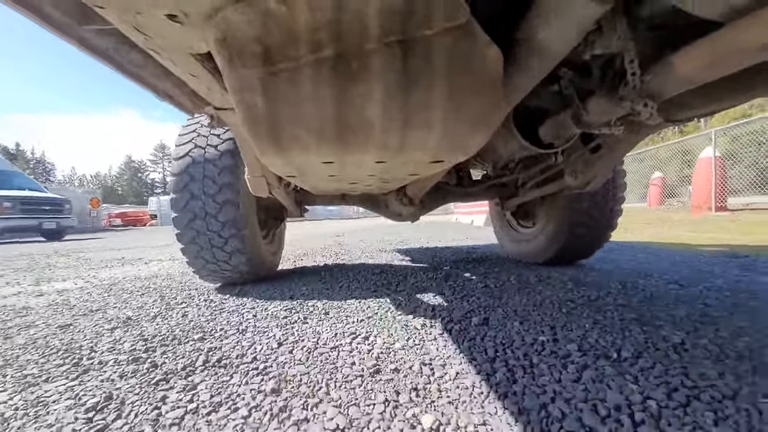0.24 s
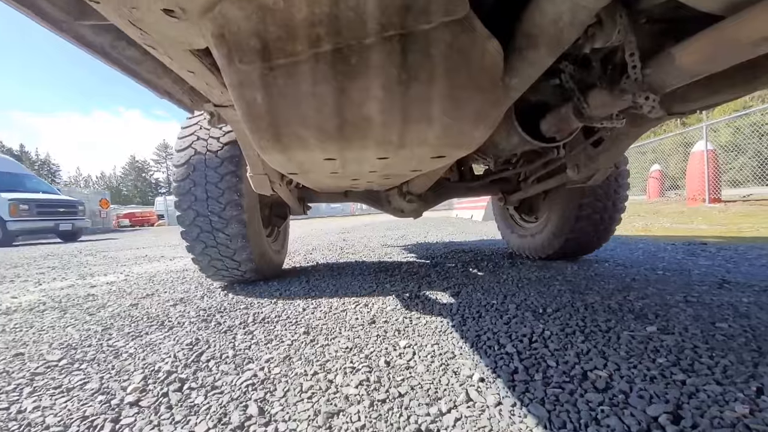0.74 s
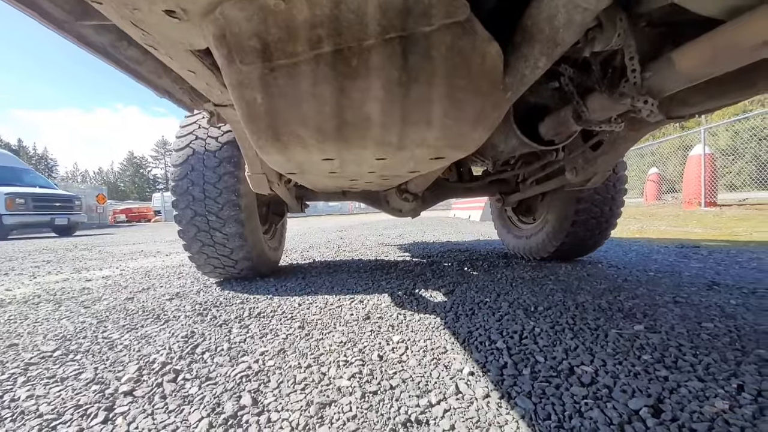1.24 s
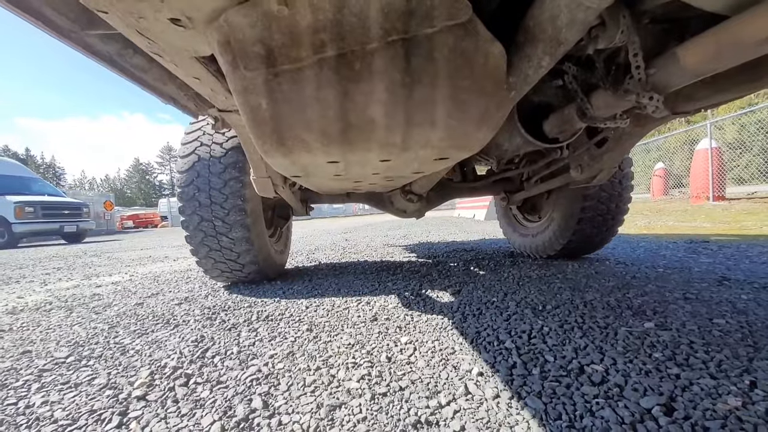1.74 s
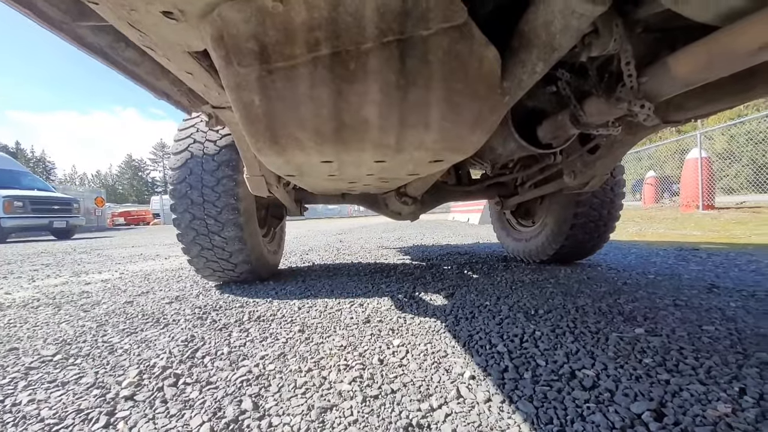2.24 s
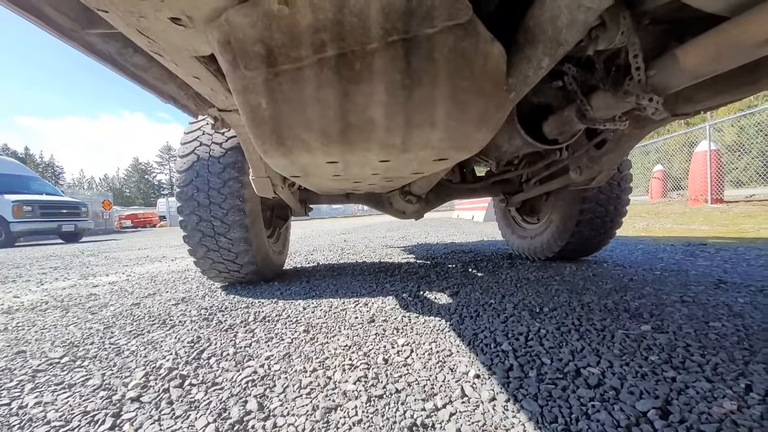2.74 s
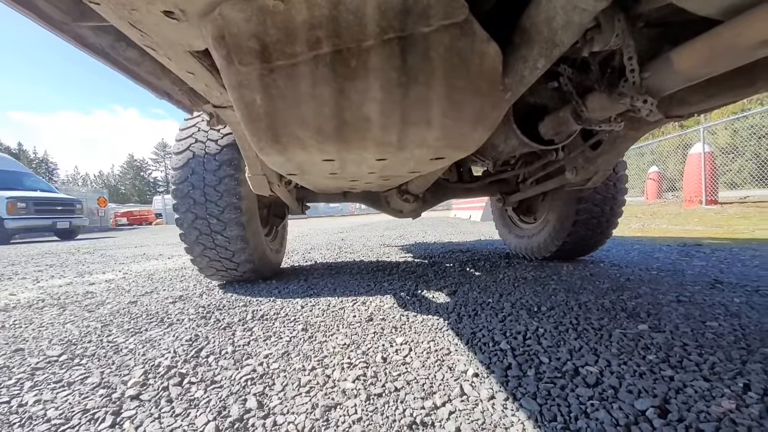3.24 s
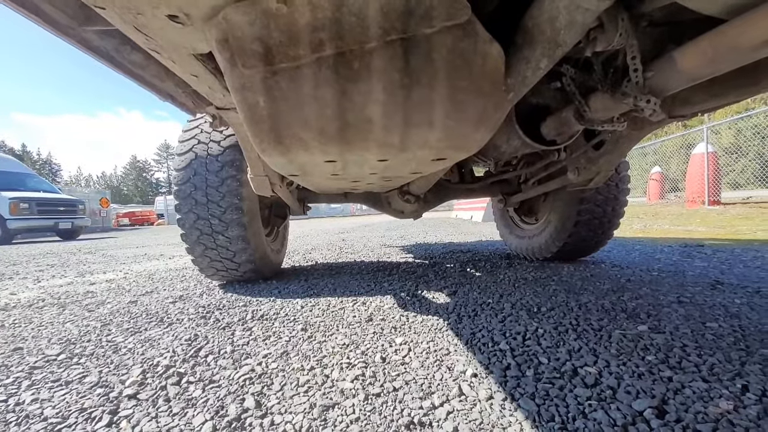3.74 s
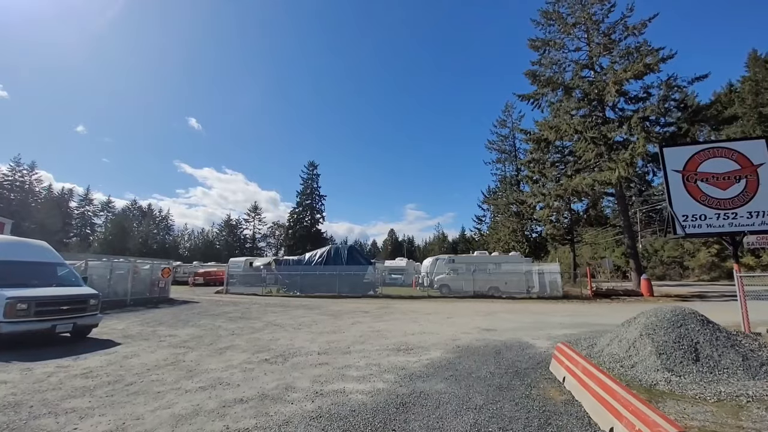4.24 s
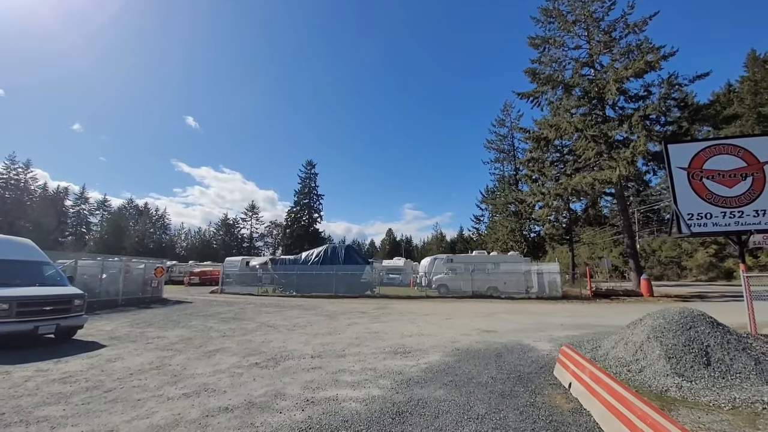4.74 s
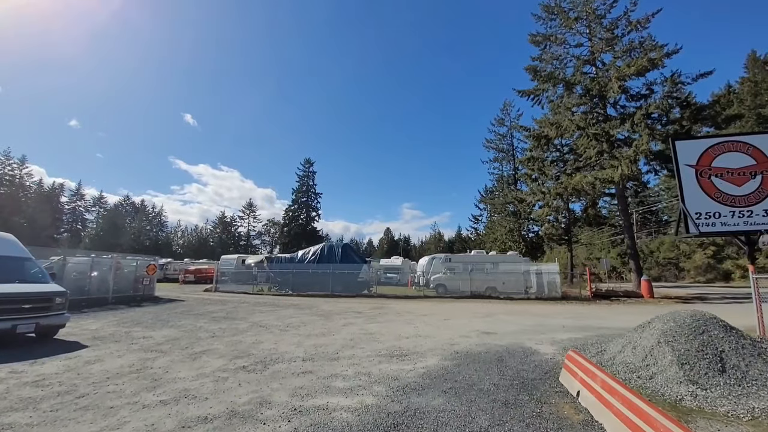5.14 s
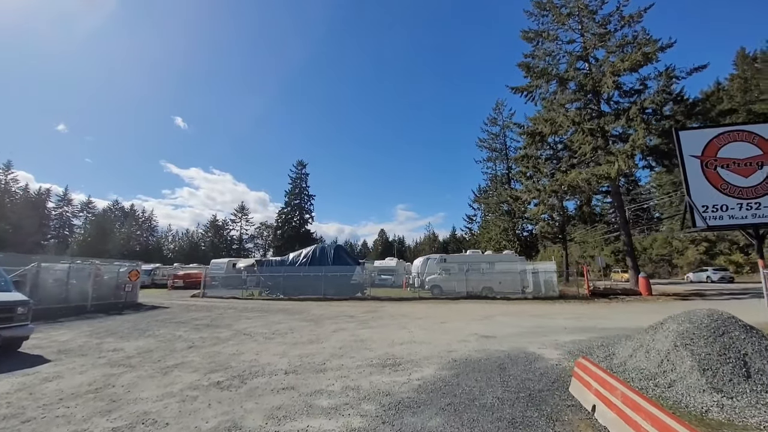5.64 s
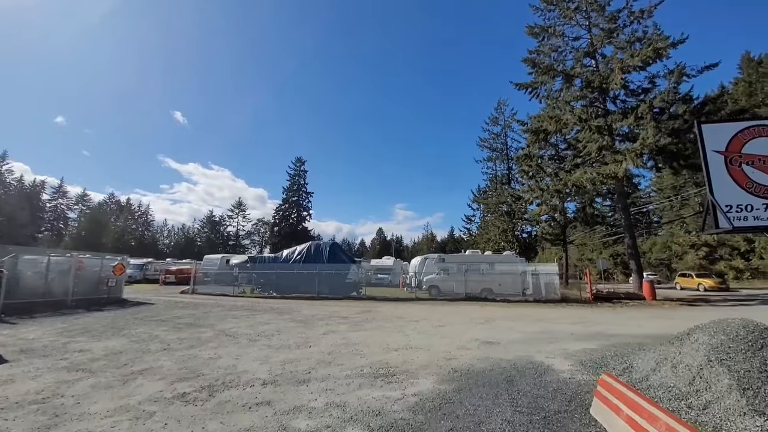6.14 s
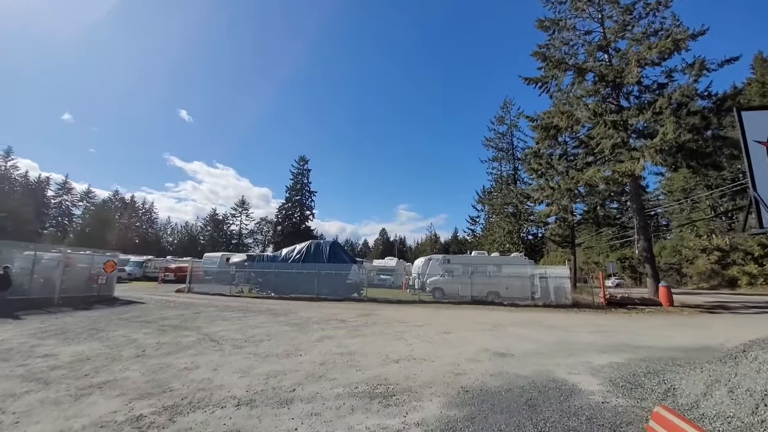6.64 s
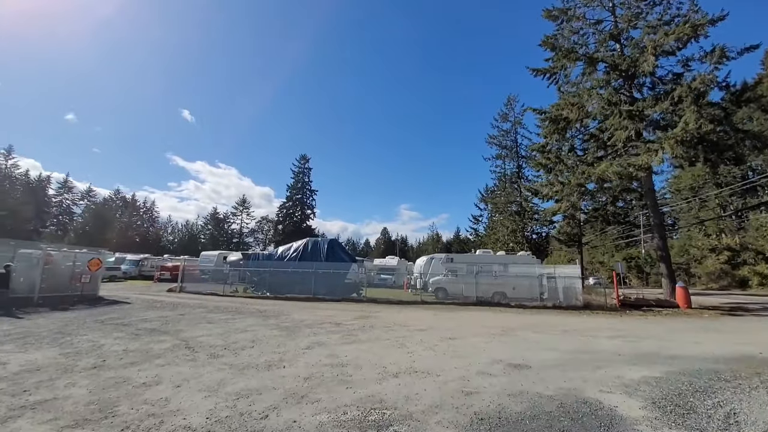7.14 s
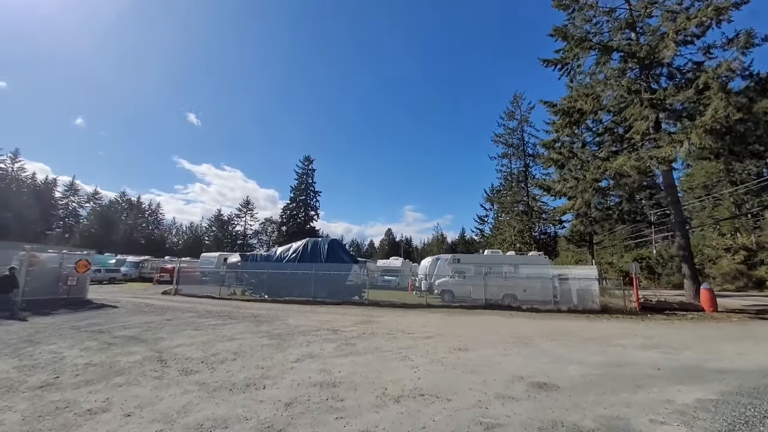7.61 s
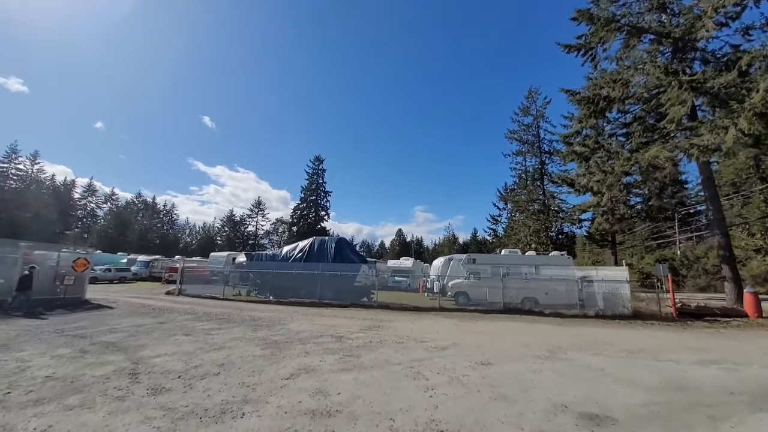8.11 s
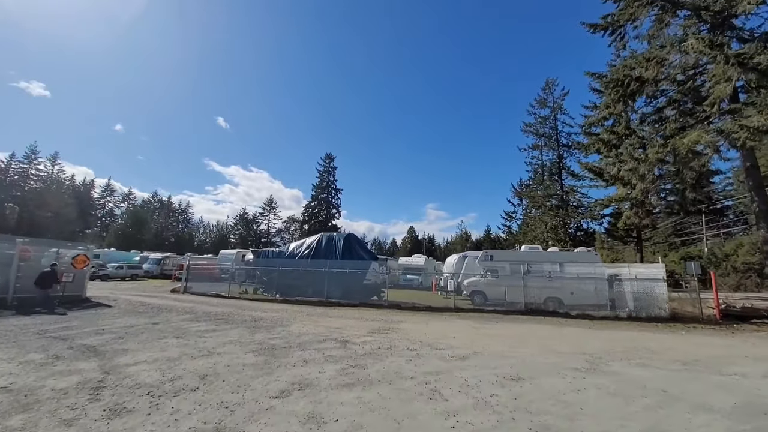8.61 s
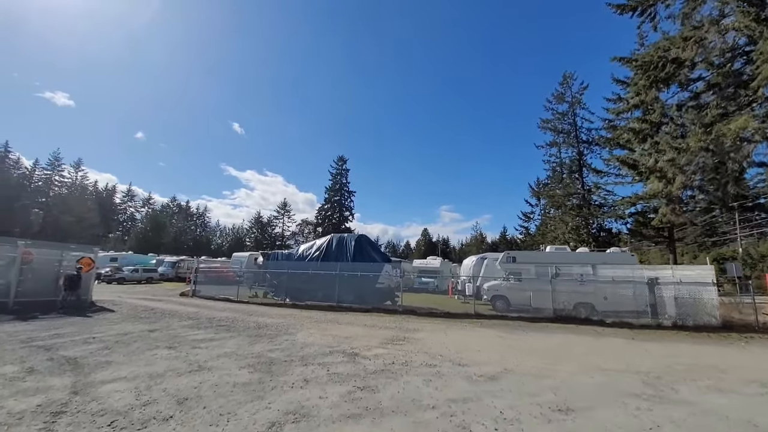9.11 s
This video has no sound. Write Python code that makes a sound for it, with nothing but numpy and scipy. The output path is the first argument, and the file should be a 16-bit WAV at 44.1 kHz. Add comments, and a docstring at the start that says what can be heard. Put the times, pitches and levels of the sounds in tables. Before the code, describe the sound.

A truck's throbbing engine and drive shaft are heard close up under the floor, with several knocks at the start. A brief turbo flutter follows, then the tyres grow louder, hissing and flinging grit. After an abrupt switch to the front, the engine note falls toward idle while gravel crunches steadily and a cluster of bumps rattles the suspension.

```python
"""A truck's turbocharged four-cylinder engine drones, heard first from under the floor, then the front.
Each firing sends a pulse that rings the exhaust, and the turning drive shaft rings the axle.
When the throttle shuts, trapped air flutters out of the turbo and the tyres hiss over gravel.
At the front the engine sinks to idle while the gravel crunches. Bumps make the suspension knock."""
import sys
import numpy as np
from scipy import signal
from scipy.fft import rfft, irfft, next_fast_len
from scipy.io import wavfile
from scipy.ndimage import uniform_filter1d, map_coordinates

SR = 44100
rng = np.random.default_rng(int(sys.argv[2]) if len(sys.argv) > 2 else 0)


def transcribe(signal):
    """Save signal, clipped to [-1, 1], as a 16-bit WAV file at the path in sys.argv[1]."""
    frames = np.atleast_2d(signal).T
    limited = np.clip(frames, -1, 1)
    pcm = np.round(limited * 32767).astype(np.int16)
    wavfile.write(sys.argv[1], SR, pcm)


N = 413199
FRONT_S = 4.066  # when the listener moves to the front
SIDE_TYRE = dict(direct=.55, lag_ms=.48)  # how a tyre off to one side reaches the two ears

# The tyres from below. Each row: time in seconds, rolling and scrubbing levels in relative dB.
TYRE_LEVELS_UNDER = [(2.05, -60, -76), (2.22, -54, -69.5), (2.63, -48, -61), (3.15, -42, -50.5),
                     (3.35, -43.5, -54), (3.65, -47, -46), (3.9, -47.5, -54), (4.01, -47, -56.5),
                     (4.05, -49, -55)]
# The engine from the front. Each row: time in seconds, firings a second, exhaust level in relative dB.
ENGINE_SLOWING = [(4.12, 56.4, -19.5), (4.25, 58.66, -21), (4.35, 59.17, -18), (4.51, 55.86, -25.5),
                  (4.98, 47.52, -28), (5.2, 43.54, -30.5), (5.61, 37.83, -32), (5.98, 35.96, -23),
                  (6.49, 35.9, -24.5), (7.31, 38.98, -28), (7.65, 37.28, -31), (7.98, 30.34, -28.5),
                  (8.37, 30.55, -29), (8.74, 29.07, -27.5), (8.87, 28.9, -26), (9.35, 27.14, -26)]
# Two noises from below, one gritty, one hissing. Each row: frequency in Hz, gain in dB.
GRITTY_COLOUR = [(700, -49), (1200, -18), (1420, -6), (1800, -11.5), (2850, -9.5), (3700, -17.5),
                 (6000, -55)]
HISSY_COLOUR = [(2000, -51), (3400, -6.5), (4650, -1.5), (5200, -7), (7300, -11), (8100, -9.5),
                (9100, -13.5), (12400, -12.5), (15800, -21.5)]


def amp(db):
    """Turn decibels into a gain."""
    return 10 ** (np.asarray(db) / 20)


def unit(x):
    """Scale a signal to an average (rms) level of 1."""
    return x / np.sqrt(np.mean(x ** 2) + 1e-20)


def clock():
    """The time in seconds at each sample."""
    return np.arange(N) / SR


def gain_at(colour, hz):
    """Read a gain at any frequency from rows of Hz and dB."""
    row_hz, row_db = np.transpose(colour)
    return amp(np.interp(np.log(hz + 1), np.log(row_hz + 1), row_db))


def curves(rows):
    """Join timed rows with straight lines: one curve for each column after the time."""
    times, *columns = np.transpose(rows)
    return [np.interp(clock(), times, column) for column in columns]


def swell(peak_s, db, width_s):
    """A gain that rises and falls in a bell shape."""
    return amp(db) * np.exp(-.5 * ((clock() - peak_s) / width_s) ** 2)


def wobble(rate):
    """A smooth curve through `rate` random values a second."""
    curve = map_coordinates(rng.standard_normal(8192), [np.arange(0, N, 16) * rate / SR], mode="wrap")
    return np.interp(np.arange(N), np.linspace(0, N, len(curve)), curve)


def filtered(x, response):
    """Multiply each frequency in x by response(hz)."""
    size = next_fast_len(N + SR // 4, True)
    return irfft(rfft(x, size) * response(np.fft.rfftfreq(size, 1 / SR)), size)[..., :N]


def stereo(x, lag_ms):
    """The sound reaches the left ear lag_ms after the right."""
    return filtered(x, lambda hz: np.exp(np.outer([-1, 1], 1j * np.pi * hz * lag_ms / 1000)))


def resonate(x, body, size=16384):
    """Let x ring a body described by rows of Hz and dB."""
    cepstrum = irfft(np.log(gain_at(body, np.fft.rfftfreq(size, 1 / SR))))
    # folding onto the first half makes the ring follow each push, never lead it
    cepstrum[1:size // 2] *= 2
    cepstrum[size // 2 + 1:] = 0
    ring = irfft(np.exp(rfft(cepstrum)))
    return signal.fftconvolve(x, ring)[:N]


def throb(cycles, body, uneven, jitter_ms, scatter_db, lag_ms):
    """One pulse a cycle rings a body, held at a steady level; every other pulse is weaker."""
    starts = np.flatnonzero(np.diff(np.floor(cycles)))
    size_luck, time_luck = rng.standard_normal((1024, 2))[:len(starts)].T
    sizes = amp(scatter_db * size_luck) * (1 + uneven * (-1) ** np.arange(len(starts)))
    starts = np.clip(starts + time_luck * jitter_ms * SR / 1000, 0, N - 1).astype(int)
    ringing = resonate(np.bincount(starts, sizes, N), body)
    power = uniform_filter1d(uniform_filter1d(ringing ** 2, size=SR // 8), size=SR // 8)
    return stereo(ringing / np.sqrt(np.abs(power) + 1e-16), lag_ms)


def rush(colour, direct, lag_ms, grain_db, patchy_db):
    """Grainy, patchy stereo noise at level 1; a share arrives directly, the rest is scattered."""
    grainy = rng.standard_normal((3, N)) * amp(grain_db * wobble(700))
    bands = signal.stft(grainy, nperseg=512)[2]
    flicker = rng.standard_normal(bands.shape[1:])
    flicker = uniform_filter1d(uniform_filter1d(flicker, size=6, axis=0), size=12, axis=1)
    patchy = signal.istft(bands * amp(patchy_db * unit(flicker)), nperseg=512)[1][:, :N]
    pair = np.sqrt(direct) * stereo(patchy[0], lag_ms) + np.sqrt(1 - direct) * patchy[1:]
    return unit(filtered(pair, lambda hz: gain_at(colour, hz)))


def chuff(firings, depth_db):
    """A gain that swells just after each firing, or dips if the depth is negative."""
    return unit(amp(depth_db * np.cos(2 * np.pi * (firings - .25))))


def engine_load(lift_s=1.26, ease_db_per_s=2.5, shut_db_per_s=19):
    """How hard the engine works, as a gain: it eases, then drops when the driver lifts off."""
    t = clock()
    return amp(-ease_db_per_s * t - shut_db_per_s * np.maximum(t - lift_s, 0))


def rumble(**texture):
    """A steady, deep noise behind everything else."""
    # Each row: frequency in Hz, gain in dB.
    deep_colour = [(20, -39), (42, -8), (60, -2), (170, -9.5), (260, -13.5), (500, -80.5)]
    return rush(deep_colour, **texture)


def tyres_under():
    """Road noise from below follows the engine load at first, then the tyres rolling and scrubbing."""
    # A low roar and a higher road noise. Each row: frequency in Hz, gain in dB.
    roar_colour = [(130, -34), (210, -7), (330, 1), (440, -6), (560, -11), (900, -42.5)]
    road_colour = [(300, 1), (500, -3), (780, 3), (1100, -1.5), (1350, -11), (2500, -60)]
    load = engine_load()
    rolling, scrubbing = amp(curves(TYRE_LEVELS_UNDER))
    roar = rush(roar_colour, direct=.68, lag_ms=.19, grain_db=4, patchy_db=2.5)
    roar *= np.hypot(amp(-26) * load, amp(3) * rolling)
    road = rush(road_colour, direct=.64, lag_ms=.24, grain_db=.5, patchy_db=2.5)
    road *= np.hypot(amp(-30) * load, amp(4.5) * rolling)
    gravel = rush(GRITTY_COLOUR, **SIDE_TYRE, grain_db=1, patchy_db=2)
    gravel *= amp(-13) * (rolling * scrubbing) ** .33
    hiss = amp(5.5) * scrubbing * rush(HISSY_COLOUR, **SIDE_TYRE, grain_db=1, patchy_db=2)
    return roar + road + gravel + hiss


def tyres_front(road_grind=.19, crunch_grind=.5, road_fade_db_per_s=.02):
    """Gravel crunches under the tyres; each grind share sets how far a noise follows the grinding."""
    # Each row: time in seconds, rolling and grinding levels in relative dB.
    tyre_levels = [(4.15, -48, -66), (4.28, -48, -67), (4.61, -47, -72.5), (5.01, -48, -74.5),
                   (5.8, -46, -72.5), (6.4, -44, -62.5), (7.02, -43, -60.5), (7.42, -44.5, -62),
                   (8.07, -43, -67.5), (8.6, -44.5, -66), (8.9, -42.5, -69.5), (9.3, -45.5, -68)]
    # Four tyre noises, from low to high. Each row: frequency in Hz, gain in dB.
    road_colour = [(100, -42), (200, -7.5), (260, -3), (390, -6), (640, -7), (850, -6.5), (1200, -12),
                   (2200, -65)]
    gravel_colour = [(620, -30), (1050, -2.5), (1300, 1), (1900, -1.5), (2800, -12.5), (3200, -25),
                     (6000, -78)]
    crunch_colour = [(1700, -28.5), (2900, -2.5), (3400, -4.5), (4150, -9), (5100, -12.5), (7200, -27),
                     (10000, -56)]
    hiss_colour = [(4000, -27), (6800, -4), (8200, -2.5), (9400, -5.5), (12300, -7.5), (15800, -16)]
    roll_db, grind_db = curves(tyre_levels)
    firings = np.cumsum(curves(ENGINE_SLOWING)[0]) / SR
    road_db = roll_db + road_grind * (grind_db - roll_db) - road_fade_db_per_s * (clock() - FRONT_S)
    road = amp(road_db + 15.5) * rush(road_colour, direct=.91, lag_ms=.45, grain_db=.5, patchy_db=1.5)
    road *= chuff(firings, depth_db=-1.5)
    gravel = amp(roll_db + 6) * rush(gravel_colour, direct=.24, lag_ms=.34, grain_db=1, patchy_db=1)
    crunch_db = roll_db + crunch_grind * (grind_db - roll_db)
    crunch = amp(crunch_db + 4.5) * rush(crunch_colour, **SIDE_TYRE, grain_db=-1.5, patchy_db=.5)
    hiss = amp(grind_db + 3.5) * rush(hiss_colour, direct=.3, lag_ms=.48, grain_db=1.2, patchy_db=1.8)
    return road + gravel + crunch + hiss


def stones_and_squeal(band_octaves=.31):
    """Patches of loose stone swell and fade; a brief high squeal sounds near four seconds."""
    # Each row: peak time in seconds, level in dB, width in seconds, centre frequency in Hz.
    noise_swells = [(3.055, -50, .12, 5300), (3.247, -38, 0.12, 740), (3.992, -45, 0.028, 5215),
                    (6.25, -45.5, 0.43, 2620), (6.278, -55, 0.12, 5200), (6.799, -50, 0.071, 4270),
                    (6.85, -37.5, 0.12, 1615), (7.227, -36, 0.19, 1870), (8.417, -53, 0.33, 4200),
                    (9.0, -37, 0.62, 842)]
    grains = rush([(300, .0094), (15000, 0)], **SIDE_TYRE, grain_db=-2, patchy_db=2)
    out = np.zeros((2, N))
    for peak_s, db, width_s, hz in noise_swells:
        edges_hz = hz * 2 ** (band_octaves * np.array([-.5, .5]))
        band = signal.butter(2, edges_hz, "band", fs=SR, output="sos")
        out += swell(peak_s, db, width_s) * unit(signal.sosfilt(band, grains))
    return out


def grit_sprays(attack_s=.005, tilt_from_hz=750):
    """The tread flings grit in sudden bursts that die away; the finer the grit, the brighter."""
    # Each row: start in seconds, level in dB, decay in seconds, treble tilt in dB per octave.
    bursts = [(3.21, -30, .035, -2), (3.97, -49, .04, 1), (7.69, -63, .025, 3), (8.30, -65, .02, 3),
              (9.215, -56, .04, 3)]
    # The noise of flying grit. Each row: frequency in Hz, gain in dB.
    grit_colour = [(300, -30), (750, 0), (1600, -2), (2700, 1), (4500, -5), (9500, -11), (12000, -2),
                   (15800, -5)]
    grit = rush(grit_colour, direct=.3, lag_ms=.465, grain_db=1, patchy_db=2)
    out = np.zeros((2, N))
    for start_s, db, decay_s, tilt in bursts:
        age = np.maximum(clock() - start_s, 0)
        tilted = unit(filtered(grit, lambda hz: amp(tilt * np.log2(np.maximum(hz, tilt_from_hz)))))
        out += amp(db) * (1 - np.exp(-age / attack_s)) * np.exp(-age / decay_s) * tilted
    return out


def suspension_knocks(spread_octaves=.23, attack_s=.001, gain_db=-1):
    """Bumps ring the suspension; each blow favours the ringing tones near its own pitch."""
    # Each row: start in seconds, peak level in relative dB, favoured pitch in Hz.
    bumps = [(0.066, -12, 940), (0.092, -2, 735), (0.207, -9, 775), (0.371, -10.5, 772), (0.537, -10, 940),
             (0.606, -21, 786), (5.162, -26, 541.3), (5.852, -19, 533), (5.942, -19, 613),
             (6.194, -17.5, 607), (6.353, -9.5, 560), (6.408, -1, 563), (6.423, -6.5, 540),
             (6.492, -8.5, 510), (6.933, -19, 680), (8.56, -9.5, 577)]
    # The suspension's tones. Each row: frequency in Hz, level in relative dB, seconds to fade by 60 dB.
    ringing_tones = [(282, 6.5, 0.15), (418, -4, 0.098), (458, -7.5, 0.048), (535, -3.5, 0.032),
                     (599, -13.5, 0.13), (693, -3, 0.05), (777, -0.5, 0.041), (932, 3.5, 0.024),
                     (1066, 6, 0.014)]
    hz, tone_db, fade_s = np.transpose(ringing_tones)[:, :, None]
    out = np.zeros(N + SR)
    t = np.arange(SR // 4) / SR
    for start_s, db, pitch_hz in bumps:
        level_luck, pitch_luck = rng.standard_normal((2, len(hz), 1))
        weight = amp(tone_db + 2 * level_luck) / (1 + (np.log2(hz / pitch_hz) / spread_octaves) ** 2)
        tones = np.sin(2 * np.pi * hz * (1 + .023 * pitch_luck) * t)
        ring = np.sum(weight * amp(-60 * t / fade_s) * tones, axis=0)
        ring *= 1 - np.exp(-t / attack_s)
        out[round(start_s * SR):][:len(t)] += amp(db + gain_db) * ring / np.abs(ring).max()
    return stereo(out[:N], lag_ms=.28)


def driveline():
    """Each turn of the drive shaft rings the axle, making a drone that beats against the exhaust."""
    # Each row: time in seconds, shaft turns a second.
    shaft_speed = [(0, 25.6), (.6, 23.3), (1.1, 22.5), (2.1, 22.4), (3.2, 21.3), (4.06, 22.9)]
    # How the axle rings. Each row: frequency in Hz, gain in dB.
    axle_body = [(20, -84), (46, -10.5), (70, -3.5), (90, -1.5), (116, -7), (150, -11), (172, 2.5),
                 (205, -19.5), (245, -20), (290, -15.5), (340, -29.5), (420, -31), (700, -38), (1500, -94)]
    turns = np.cumsum(curves(shaft_speed)[0]) / SR
    rolling, _ = amp(curves(TYRE_LEVELS_UNDER))
    gain = np.hypot(amp(-18.5) * engine_load(), amp(-3) * np.sqrt(rolling))
    return gain * throb(turns, axle_body, uneven=.034, jitter_ms=.06, scatter_db=2.4, lag_ms=.37)


def turbo_flutter(start_s=1.2807, first_hz=28.35, slowing_hz_per_s=34.2, rise_s=.0049, echo_s=.013):
    """Trapped air escapes back through the turbo in double puffs, slower and weaker as it drains."""
    # The noise of escaping air. Each row: frequency in Hz, gain in dB.
    air_colour = [(290, -16), (500, 1.5), (595, -43), (945, -16), (1280, -8.5), (1400, -9), (2280, -13),
                  (2790, -8), (4640, -10.5), (5130, -17), (15800, -22.5)]
    rate_hz = np.sqrt(np.maximum(first_hz ** 2 - 2 * slowing_hz_per_s * np.arange(12), 1))
    puff_times = start_s + (first_hz - rate_hz) / slowing_hz_per_s
    puff_levels = -24.5 + 7.5 * np.log2(rate_hz / first_hz)  # 7.5 dB weaker when the rate halves
    age = np.arange(SR // 8) / SR / rise_s
    puff = age * np.exp(1 - age)
    flow = np.zeros(N)
    for puff_s, db in zip(puff_times, puff_levels):
        for delay_s, share in (0, 1), (echo_s, .72):
            flow[round((puff_s + delay_s) * SR):][:len(puff)] += amp(db) * share * puff
    leak = swell(peak_s=1.33, db=-38, width_s=.09)  # air escaping smoothly behind the first puffs
    air = (flow + leak) * rush(air_colour, direct=.55, lag_ms=.16, grain_db=.5, patchy_db=3.5)
    # Each puff also thumps the air box. Each row: frequency in Hz, gain in dB.
    air_box = [(15, -46), (30, -22), (48, 24), (90, -3), (200, 17), (600, -29)]
    return amp(-2) * air + amp(4) * resonate(flow, air_box)


def engine_under():
    """From below, the firings ring the exhaust with a drone and a bark; the engine bay hisses."""
    # Each row: time in seconds, firings a second.
    firing_rate = [(0.0, 30.17), (0.41, 30.1), (1.27, 29.42), (1.43, 30.95), (1.77, 36.32), (1.88, 37.55),
                   (2.03, 36.44), (2.17, 37.5), (2.86, 36.58), (4.05, 34.26)]
    # The exhaust's loudness. Each row: time in seconds, level in relative dB.
    drone_levels = [(0, -17.4), (0.22, -20), (0.44, -15), (0.95, -16.5), (1.4, -22.5), (1.9, -33.5),
                    (2.12, -23.5), (2.38, -30.5), (2.74, -22), (3.06, -29.5), (3.24, -25.5), (3.42, -29.5),
                    (4.05, -25.5)]
    # How the deep exhaust and the higher bark ring. Each row: frequency in Hz, gain in dB.
    pipe_body = [(15, -16), (30, -12), (45, -51), (69, -1), (90, -3.5), (114, 11), (148, 4), (200, -31),
                 (335, -15.5), (700, -39), (1500, -100)]
    bark_body = [(100, -52), (190, -3.5), (228, 0.5), (255, -11), (292, 3.5), (312, -5.5), (338, 2.5),
                 (365, -13.5), (420, -14.5), (700, -24.5), (1500, -76.5)]
    firings = np.cumsum(curves(firing_rate)[0]) / SR
    load = engine_load()
    rolling, _ = amp(curves(TYRE_LEVELS_UNDER))
    exhaust = throb(firings, pipe_body, uneven=.02, jitter_ms=.2, scatter_db=1.6, lag_ms=.19)
    exhaust *= amp(curves(drone_levels)[0] + 1.5)
    bark = throb(firings, bark_body, uneven=.1, jitter_ms=.08, scatter_db=1, lag_ms=.17)
    bark *= np.hypot(amp(-25) * load, amp(4) * rolling)
    texture = dict(direct=.37, lag_ms=.17, grain_db=2, patchy_db=2)
    bay_noise = amp(-35.5) * rush(GRITTY_COLOUR, **texture) + amp(-43) * rush(HISSY_COLOUR, **texture)
    return exhaust + bark + load * chuff(firings, depth_db=2.5) * bay_noise


def engine_front(revved_hz=58, tone_db_per_octave=17, bark_db_per_octave=28.5):
    """The engine winds down to idle, losing its firing tone and bark while the exhaust throbs on."""
    # How the exhaust and the bark ring from the front. Each row: frequency in Hz, gain in dB.
    pipe_body = [(22, -27.5), (42, -21), (57, -6.5), (85, -4), (113, 5), (145, -2), (185, -20.5),
                 (240, -26), (310, -16.5), (420, -38), (700, -38), (1500, -97)]
    bark_body = [(100, -53.5), (170, -6.5), (225, 4), (260, -5), (292, -1.5), (340, -5.5), (420, -20.5),
                 (700, -35), (1500, -77.5)]
    firing_hz, exhaust_db = curves(ENGINE_SLOWING)
    firings = np.cumsum(firing_hz) / SR
    octaves = np.log2(firing_hz / revved_hz)
    tone = amp(-21 + tone_db_per_octave * octaves) * np.sqrt(2) * np.sin(2 * np.pi * firings)
    exhaust = throb(firings, pipe_body, uneven=.05, jitter_ms=.17, scatter_db=1.2, lag_ms=.17)
    exhaust *= amp(exhaust_db + 1)
    bark = throb(firings, bark_body, uneven=.4, jitter_ms=.06, scatter_db=1.5, lag_ms=.41)
    bark *= amp(-28.5 + bark_db_per_octave * octaves)
    return tone + exhaust + bark


def scene():
    """The truck from below, then from the front; the sound drops out for an instant in between."""
    under = amp(-31.5) * rumble(direct=.88, lag_ms=.052, grain_db=-1.5, patchy_db=-1)
    under += tyres_under() + driveline() + turbo_flutter() + engine_under()
    front = amp(-33) * rumble(direct=.82, lag_ms=.37, grain_db=-1, patchy_db=1.5)
    front += tyres_front() + engine_front()
    fade_out = np.clip((FRONT_S - .005 - clock()) / .004, 0, 1)
    fade_in = np.clip((clock() - FRONT_S) / .015, 0, 1)
    return fade_out * under + fade_in * front + stones_and_squeal() + grit_sprays() + suspension_knocks()


def record(dry):
    """Remove the very highest treble."""
    return filtered(dry, lambda hz: hz < 15850)


dry = scene()
out = record(dry)
transcribe(out)
```